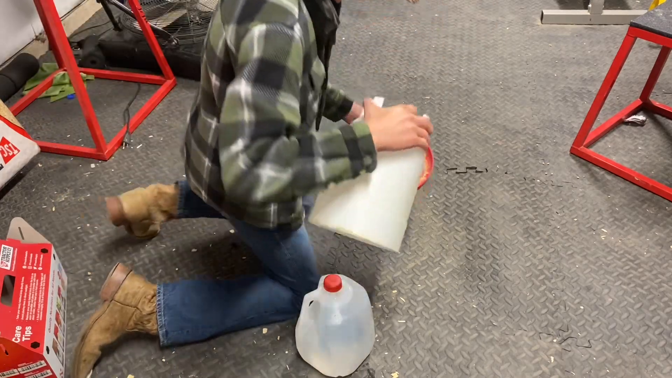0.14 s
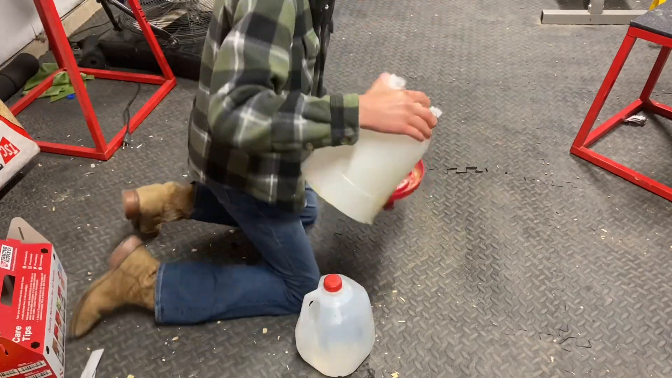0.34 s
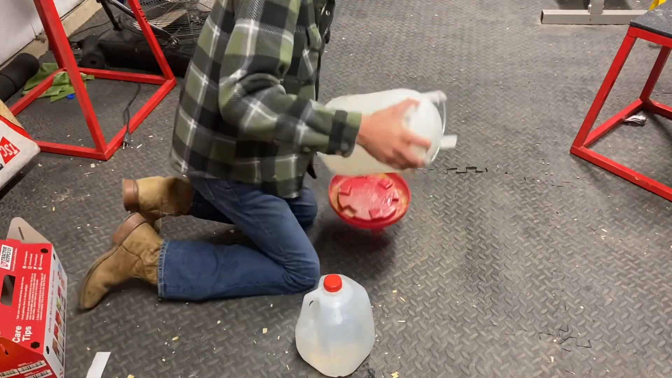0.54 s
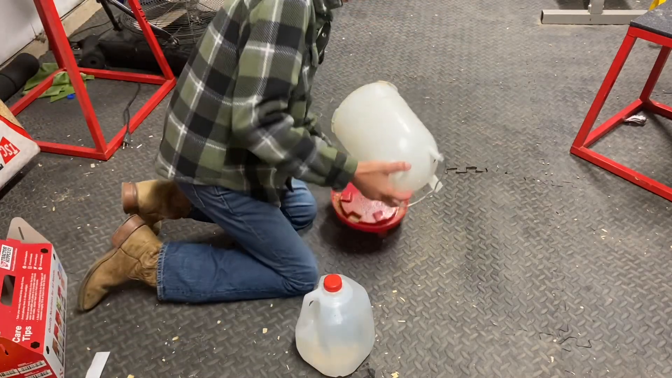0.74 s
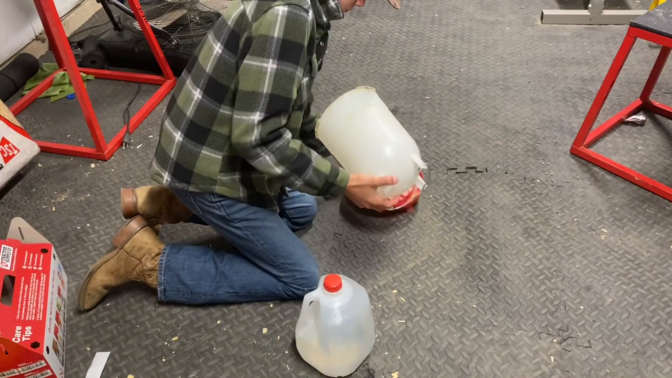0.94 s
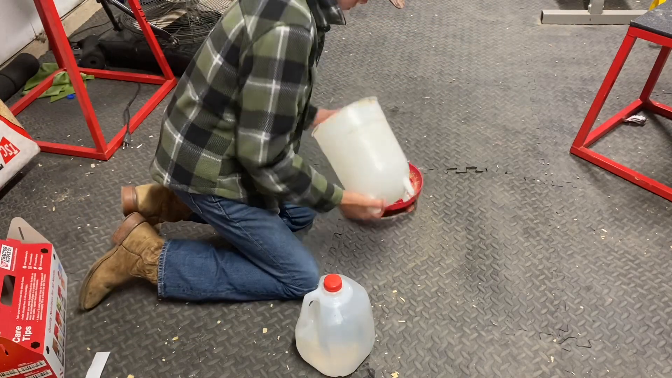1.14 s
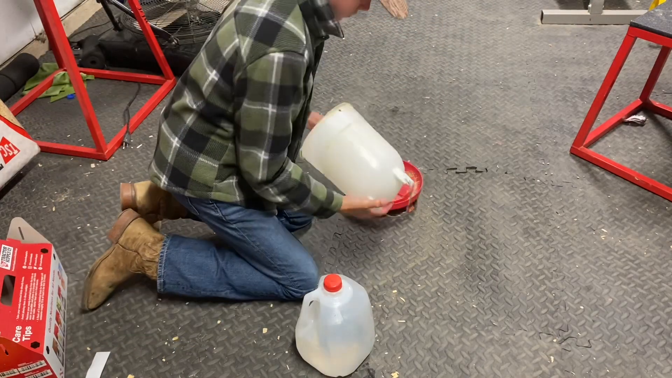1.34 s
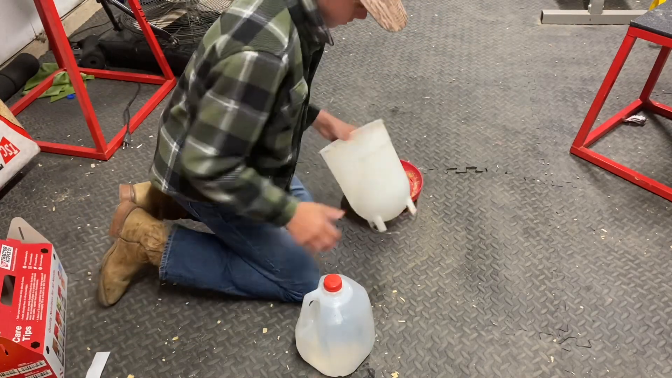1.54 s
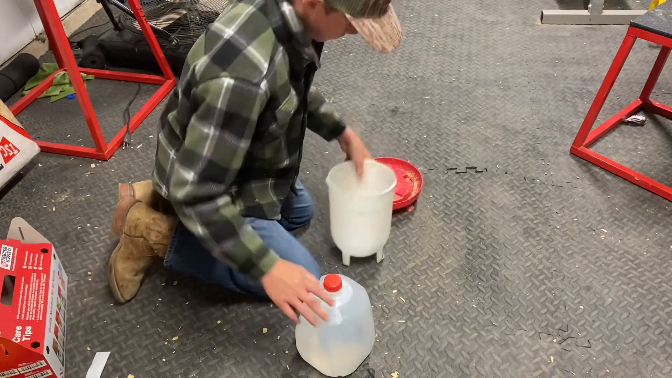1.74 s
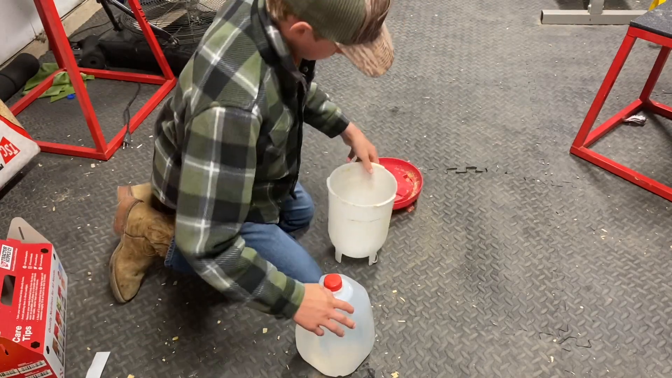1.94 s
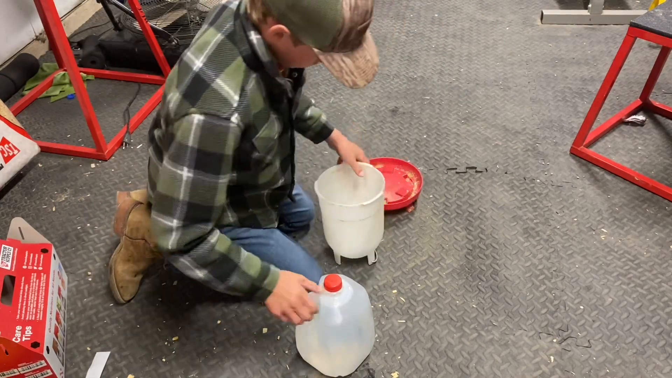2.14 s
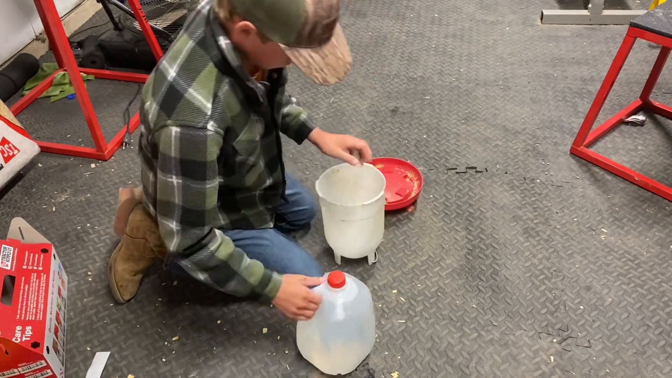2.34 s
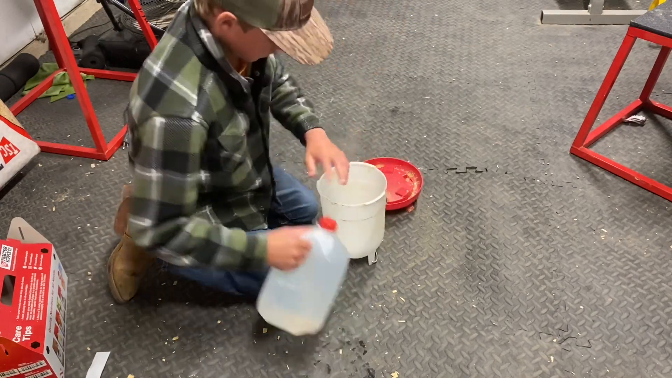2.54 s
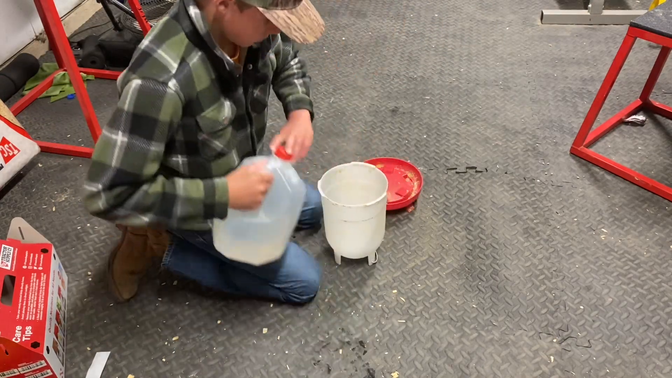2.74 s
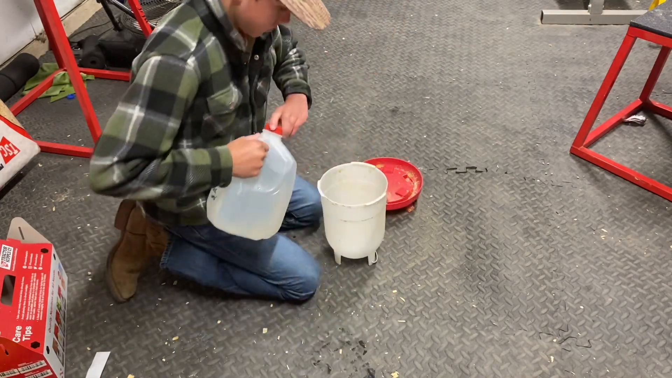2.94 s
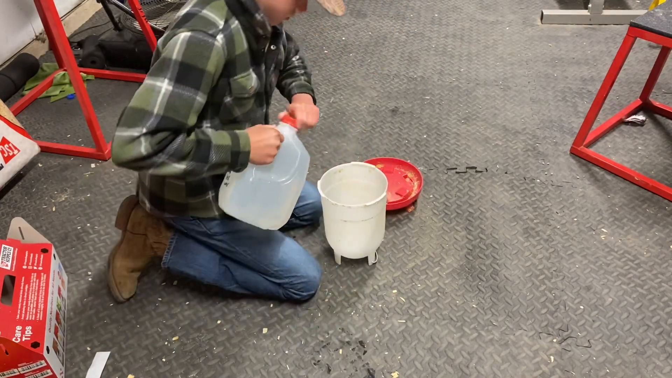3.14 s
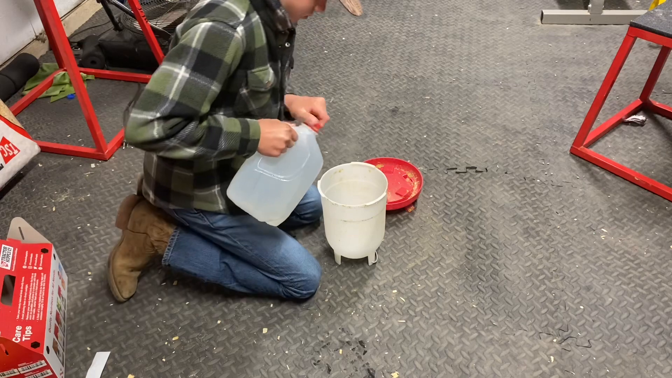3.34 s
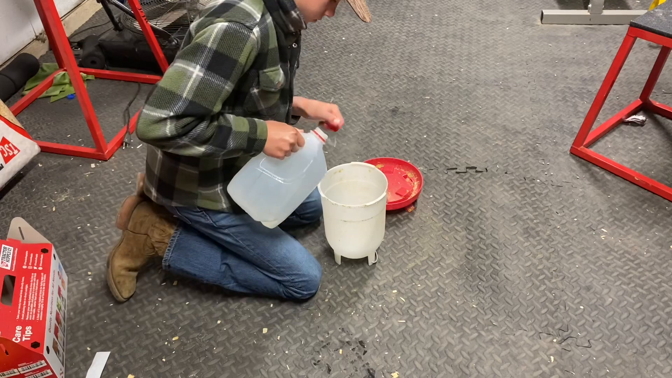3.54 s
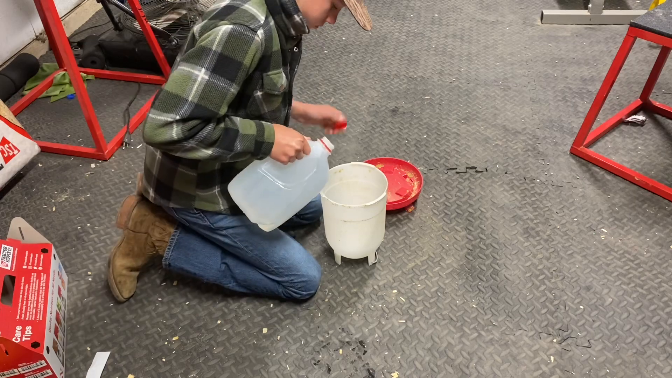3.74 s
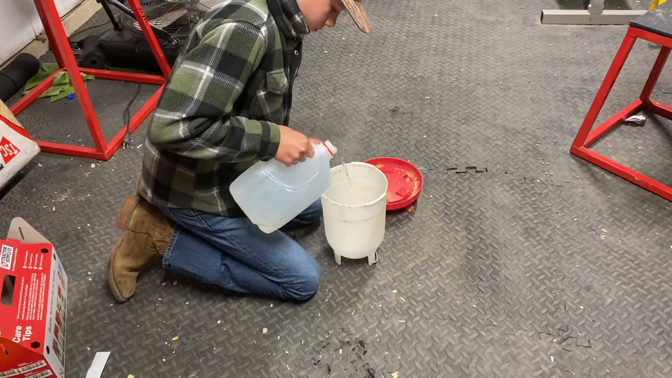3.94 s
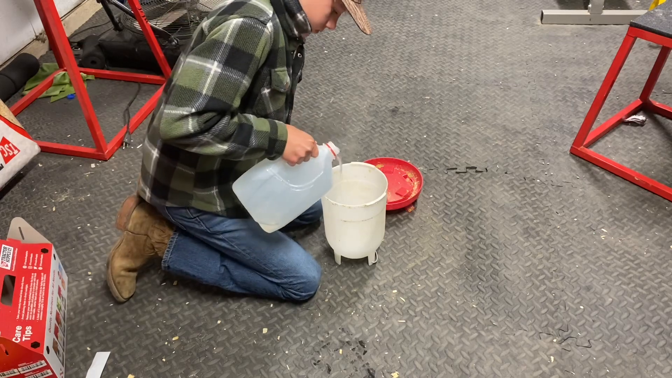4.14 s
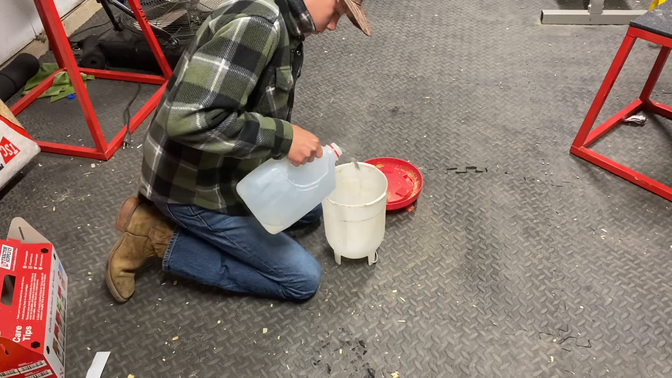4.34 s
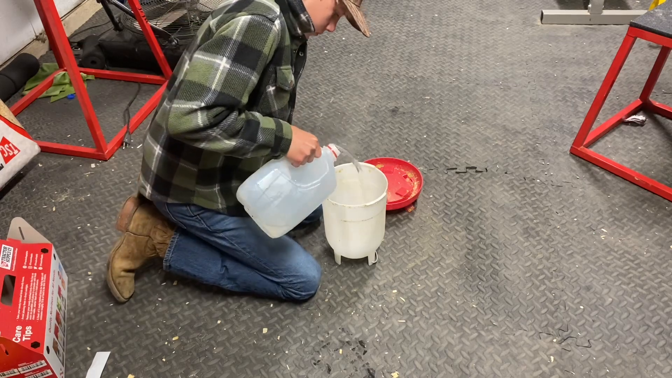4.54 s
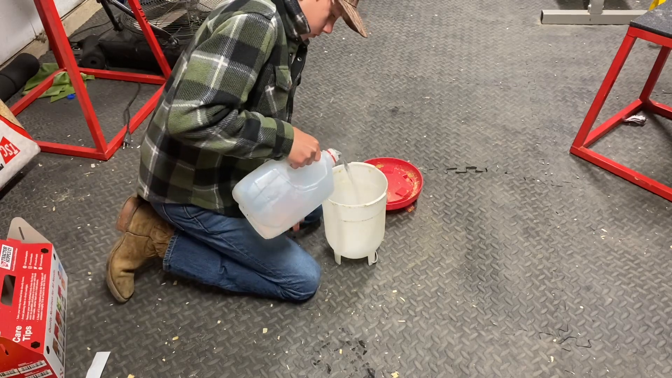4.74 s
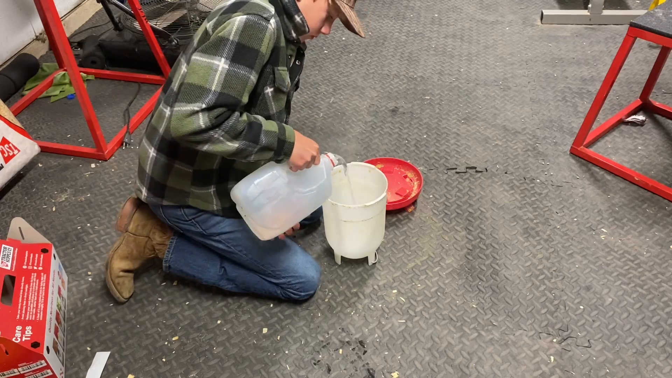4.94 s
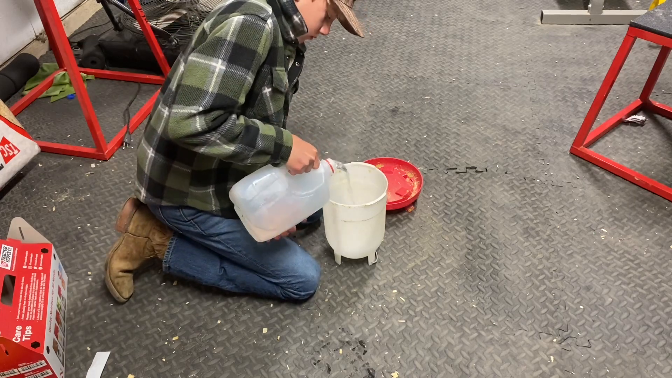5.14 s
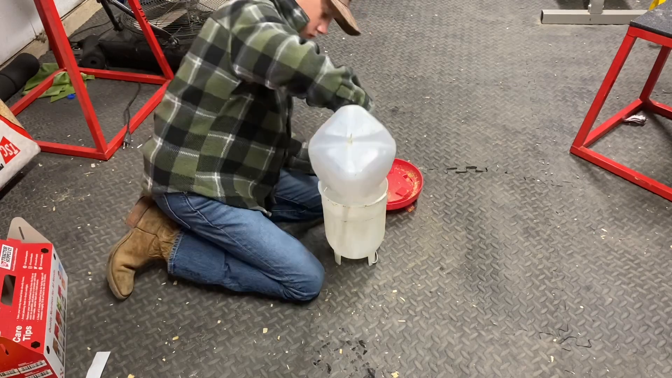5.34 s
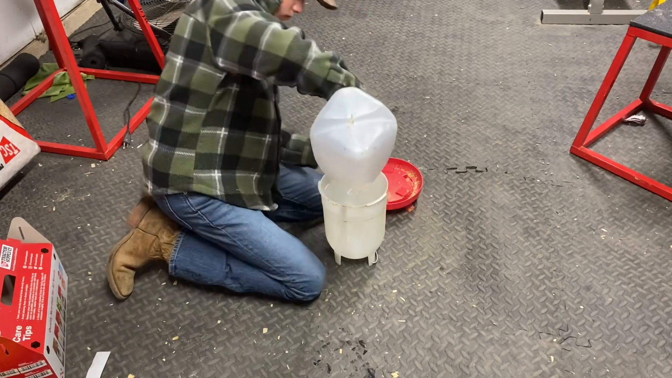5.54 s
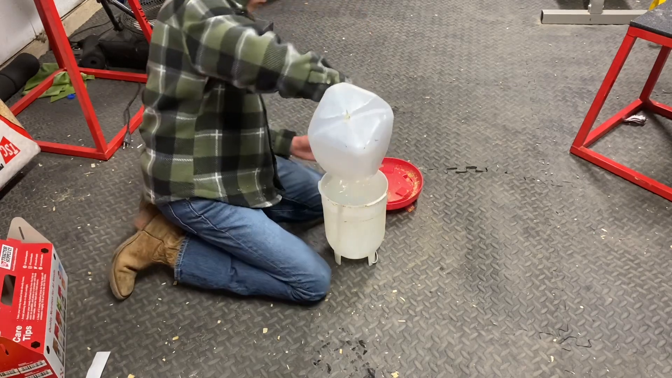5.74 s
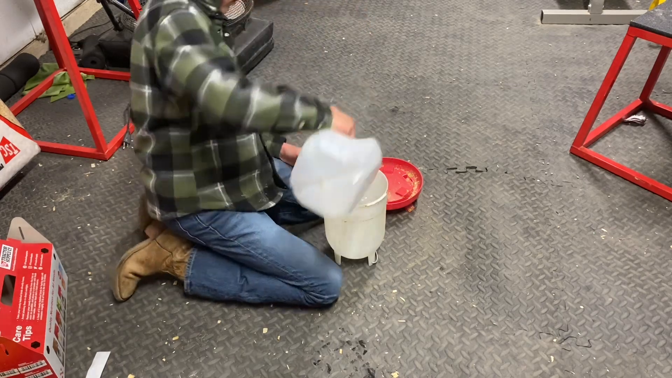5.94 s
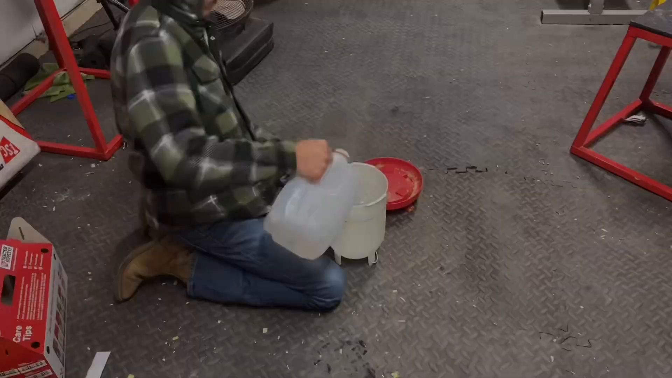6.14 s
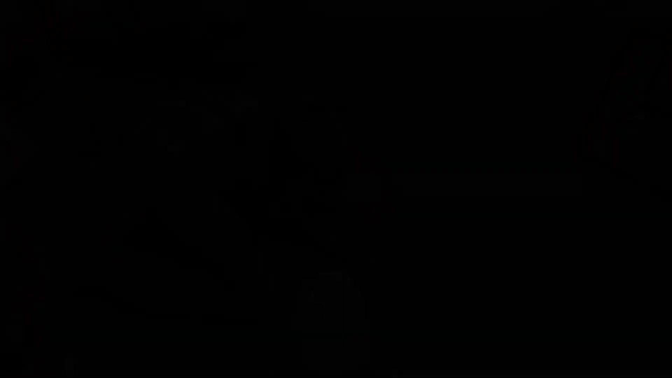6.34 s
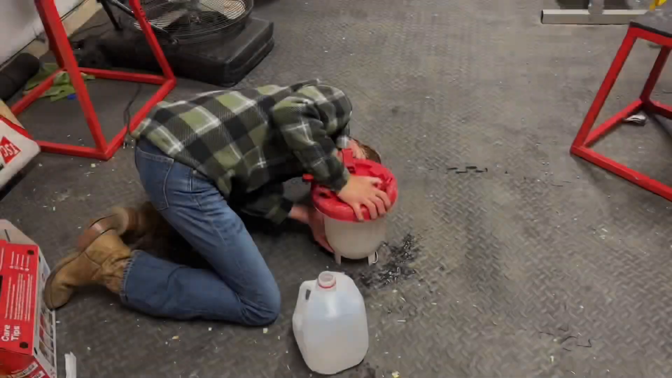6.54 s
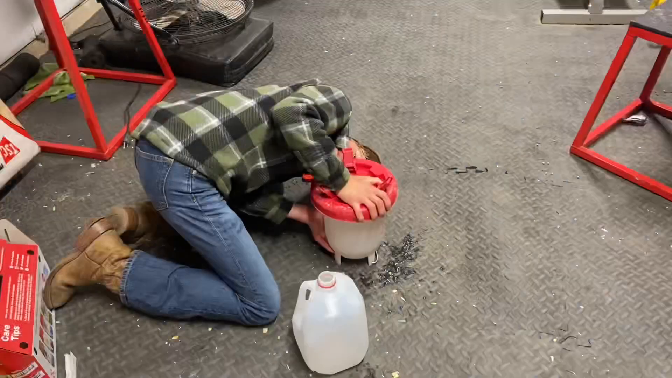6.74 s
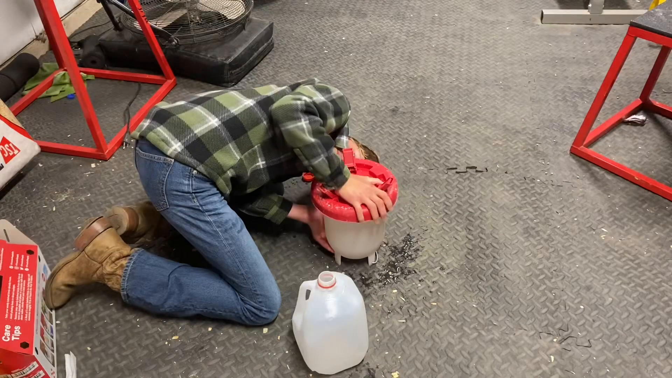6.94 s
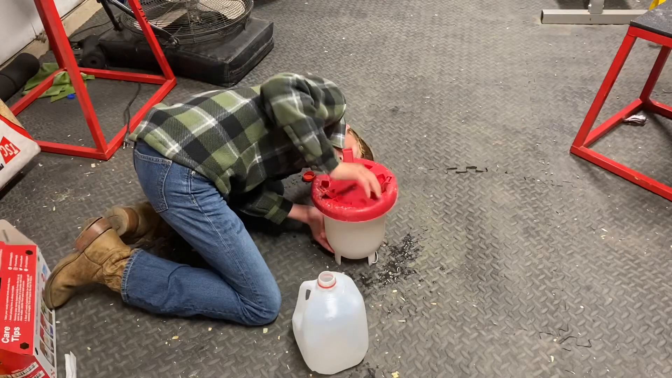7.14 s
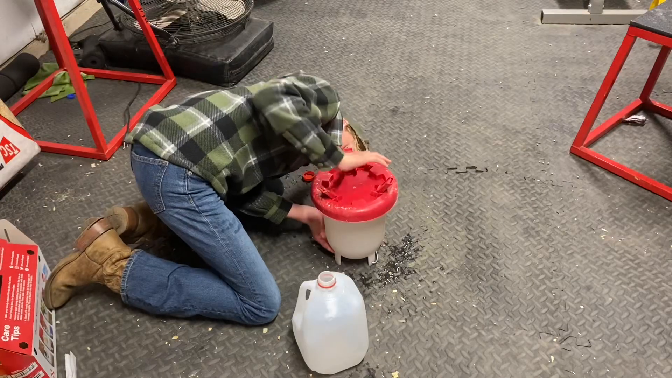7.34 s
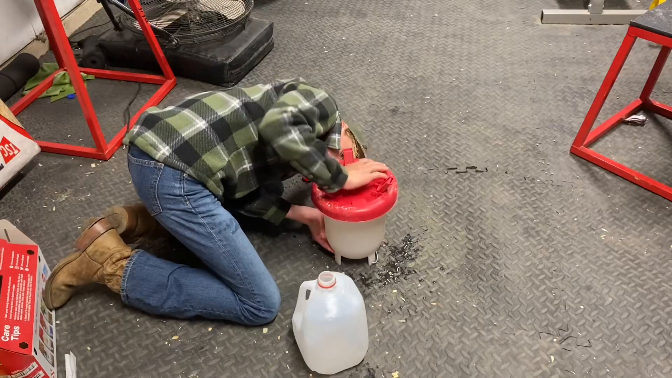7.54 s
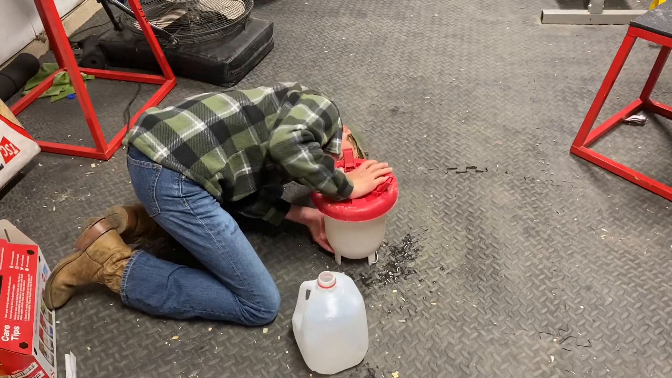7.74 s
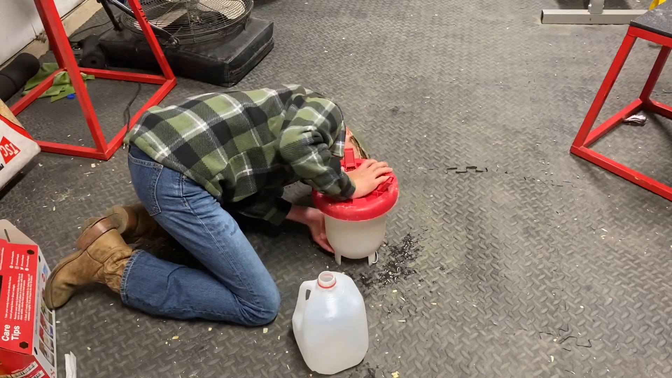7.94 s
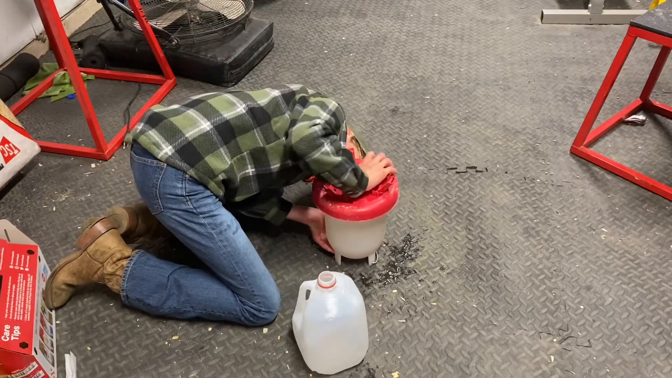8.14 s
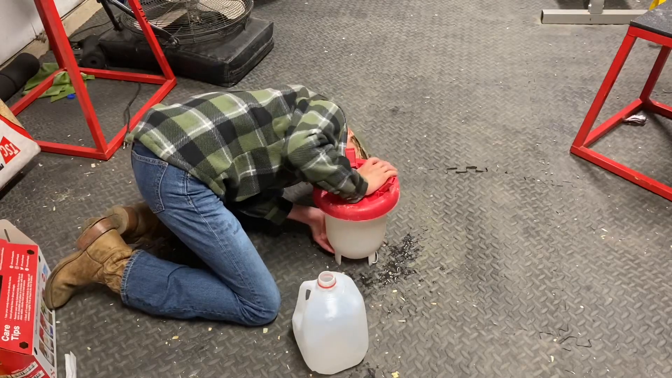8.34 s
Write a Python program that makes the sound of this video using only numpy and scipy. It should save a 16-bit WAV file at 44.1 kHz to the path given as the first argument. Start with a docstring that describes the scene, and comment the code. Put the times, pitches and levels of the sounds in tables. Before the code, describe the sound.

Close plastic handling in a live, echoing room: cloth rustle, sharp hollow knocks, then a boomy rattling set-down. After a quieter spell of small jug clicks, a loud pop leads into plinking drops, a short bubbly gush and a weaker drain. After a quick dip, duller knocks and scrapes follow. Scattered chick peeps, slightly left and roomy, grow frequent late, over low rumble and soft hiss.

```python
"""Low rumble and faint hiss lie under a hard-walled shed; sleeves rustle and chicks peep from across the room.
A plastic poultry waterer is twisted apart and its tank set on the floor: blows ring panels, walls and inner air.
A thin water jug is uncapped, pops as it flexes and is poured into the tank: ringing bubbles, slaps and noisy spray.
Then the base is pressed back on the filled tank, with thumps and scrapes. The level dips briefly twice."""
import sys
import numpy as np
from scipy import signal
from scipy.fft import rfft, irfft
from scipy.io import wavfile
from scipy.ndimage import uniform_filter1d

SR = 44100
rng = np.random.default_rng(int(sys.argv[2]) if len(sys.argv) > 2 else 0)


def file_out(sig):
    """Save sig as 16-bit WAV at sys.argv[1]."""
    # one column per channel
    cols = np.atleast_2d(sig).T
    # limit, then scale
    lim = np.clip(cols, -1, 1)
    pcm = np.round(lim * 32767).astype(np.int16)
    wavfile.write(sys.argv[1], SR, pcm)


N = 374346
T = np.arange(N) / SR

# Table levels precede each function's gain_db.
# damped modes of the empty waterer's walls: mode_hz, width_hz, level_db
WATERER_MODES = [(415, 40, -17), (760, 30, 0), (870, 45, -5), (940, 50, -7), (1200, 60, -9), (1375, 40, -5),
                 (1592, 50, -2), (1800, 90, -3), (1950, 50, -4), (2380, 80, -11), (3050, 80, -17),
                 (4480, 140, -22)]
# first splash, trickle, full stream, then the jug drains upside down: start_s, length_s, bubbles_db, spray_db
GUSHES = [(4.416, 0.02, -72, -52.5), (4.545, 0.27, -64.5, -66), (4.845, 0.42, -55.5, -54.5),
          (5.483, 0.53, -67.5, -64), (5.832, .25, -66, -62), (5.943, 0.043, -60.5, -64)]
GUSH_ATTACK_S, GUSH_RELEASE_S = 0.045, 0.14  # time to change by 20 dB


def undb(db):
    """Decibels to gain."""
    return 10 ** (np.asarray(db) / 20)


def unit(x):
    """Scale to a mean energy of one per channel."""
    return x / np.sqrt(np.mean(np.sum(x ** 2, axis=-1)))


def colour(x, points):
    """Filter by a spectrum of hz, gain_db points, straight over log frequency."""
    hz, db = np.transpose(points)
    f = np.linspace(1, SR / 2, x.shape[-1] // 2 + 1)
    gain = undb(np.interp(np.log(f), np.log(hz), db))
    return irfft(rfft(x) * gain, x.shape[-1])


def band(x, lo_hz, hi_hz, order=2):
    """Causal band-pass."""
    edges_hz = [lo_hz, min(hi_hz, SR / 2 - 100)]
    return signal.sosfilt(signal.butter(order, edges_hz, "band", fs=SR, output="sos"), x)


def normal(x, lo_hz, hi_hz):
    """Scale so that one band has an rms of one."""
    return x / np.std(band(x, lo_hz, hi_hz))


def diffuse(count, alike_hz=520):
    """Stereo noise from all around: mostly alike at both ears in the bass, unrelated in the treble."""
    mid, side = rfft(rng.standard_normal((2, count)))
    alike = 0.9 / (1 + (np.linspace(0, SR / 2, len(mid)) / alike_hz) ** 2)
    mid = mid * np.sqrt(1 + alike)
    side = side * np.sqrt(1 - alike)
    return irfft(np.array([mid + side, mid - side]), count) / np.sqrt(2)


def walk(rate_hz):
    """Random wander with a spread of one."""
    k = int(SR / rate_hz)
    steps = np.repeat(rng.standard_normal(N // k + 1), k)
    w = uniform_filter1d(steps, k)[:N]
    return w / w.std()


def add(track, start_s, x):
    """Mix a sound into a track."""
    i = min(max(int(start_s * SR), 0), N)
    track[..., i:i + x.shape[-1]] += x[..., :N - i]


def pan(left_db):
    """Channel gains for a left-minus-right level."""
    return undb(np.array([[left_db], [-left_db]]) / 2)


def swells(rows, attack_s, release_s):
    """Gain from start_s, length_s, level_db rows: each swells up, holds and dies away."""
    power = 0
    for start_s, length_s, db in rows:
        early = np.maximum(start_s - T, 0) / attack_s
        late = np.maximum(T - start_s - length_s, 0) / release_s
        power = power + undb(db - 20 * (early + late)) ** 2
    return np.sqrt(power)


def ring(t, hz, width_hz):
    """One freely decaying mode; a wider resonance decays faster."""
    return unit(np.sin(2 * np.pi * hz * t) * np.exp(-np.pi * width_hz * t))


def bubble(start_hz, cycles, glide):
    """A trapped bubble rings for some cycles and rises in pitch as it nears the surface."""
    age = T[:int(3 * cycles / start_hz * SR)] * start_hz / cycles
    return unit(np.sin(2 * np.pi * cycles * age * (1 + glide * age / 2)) * np.exp(-2 * age))


def shed(x, direct_db, tail_db, lead_s=0.000046, t60_low_s=0.52, t60_mid_s=0.53, t60_high_s=0.21,
         high_db=-3, build_s=0.0036):
    """Direct sound, a few close reflections and a diffuse tail that dulls as it fades."""
    # nearby surfaces: delay_s, gain_db relative to direct
    echoes = [(.0014, -26), (.0077, -23), (.011, -15.5), (.0186, -17.5)]
    t = T[:SR]
    noise = diffuse(len(t))
    # lo_hz, hi_hz, t60_s, level_db
    bands = [(40, 600, t60_low_s, 0), (600, 7000, t60_mid_s, 0), (7000, 18000, t60_high_s, high_db)]
    tail = 0
    for k, (lo_hz, hi_hz, t60_s, db) in enumerate(bands):
        decay = np.exp(-np.log(1000) * t / t60_s)
        tail = tail + (-1) ** k * undb(db) * band(noise, lo_hz, hi_hz) * decay
    response = undb(tail_db) * unit(tail * (1 - np.exp(-t / build_s)))
    # direct sound reaches the left port just before the right
    response[[0, 1], [0, round(lead_s * SR)]] += undb(direct_db)
    for k, (delay_s, db) in enumerate(echoes):
        # reflections come from alternate sides, 3 samples later at the far port
        i = int(delay_s * SR)
        response[k % 2, i] += undb(direct_db + db)
        response[1 - k % 2, i + 3] += undb(direct_db + db)
    return signal.fftconvolve(x[None], response, axes=1)[:, :N]


def background(rumble_db=1, flutter_db=0.5, rest_db=-80.5, air_db=-77):
    """An uneven low rumble under a faint even hiss, both coloured diffuse noise."""
    # spells of rumble: start_s, length_s, level_db
    spells = [(0, 5.27, -58.5), (5.45, 1.39, -67.5), (7.2, 0.066, -58.5)]
    # spectra: hz, gain_db
    rumble_colour = [(15, -36), (25, -11.5), (76, 4), (179, 2), (346, -10.5), (550, -16), (628, -19),
                     (682, -17.5), (818, -28.5), (904, -20.5), (1300, -29), (1690, -52.5), (2860, -120)]
    air_colour = [(120, -43), (200, -16.5), (366, -8), (473, -13.5), (1120, -15.5), (1810, -12.5),
                  (3370, -21.5), (8000, -25.5), (12000, -32), (16000, -50)]
    level = swells(spells, attack_s=0.27, release_s=0.23) + undb(rest_db)
    rumble = normal(colour(diffuse(N), rumble_colour), 35, 300)
    rumble = rumble * level * undb(rumble_db + flutter_db * walk(12))
    hiss = normal(colour(diffuse(N), air_colour), 140, 16000) * undb(air_db)
    return rumble * pan(left_db=-3.5) + hiss


def chicks(knee=0.88, late=1.7, rasp_db=7, tremble_db=2, octave_db=-20, octave_spread_db=4, gain_db=-4):
    """Whistles arch through a crest and level off; the wider the pitch span, the rougher the voice."""
    # start_s, length_s, top_hz, end_hz, level_db, late_swell_db, crest_place (0-1)
    calls = [(0, 0.018, 3350, 3120, -53.5, -22, 0.38), (0.588, 0.042, 3250, 2700, -54.5, -21, 0.2),
             (0.906, 0.063, 3640, 2830, -50.5, -26, 0.05), (3.108, .035, 3500, 3750, -68, -26, 0.23),
             (3.133, 0.033, 3734, 2773, -48.5, -21, 0.21), (3.159, 0.039, 3450, 2784, -56.5, -24, .15),
             (3.376, 0.06, 2520, 2000, -62, -23, 0.37), (3.677, 0.027, 3080, 2850, -62, -19, 0.76),
             (3.68, 0.091, 2760, 2100, -58, -31, 0.45), (3.808, 0.053, 3065, 2950, -52.5, -28, 0.21),
             (4.083, 0.041, 3900, 3400, -54, -27, 0.32), (5.404, 0.051, 2867, 2700, -51, -9, 0.48),
             (5.47, 0.058, 2666, 2570, -50, -8, 0.28), (5.717, 0.069, 2890, 2560, -45, -7, 0.2),
             (6.022, .075, 2915, 2590, -42.5, -11, .22), (6.437, 0.048, 3490, 2960, -59.5, -19, 0),
             (6.573, 0.049, 3920, 3000, -57, -2, 0), (6.673, 0.053, 3404, 2700, -63, -27, 0.02),
             (6.764, 0.056, 3790, 2730, -57, -30, .25), (6.794, 0.033, 4870, 4750, -70, -20, .2),
             (6.82, 0.06, 3780, 2700, -61, -14, 0.16), (6.894, 0.072, 3970, 3300, -54, -6, 0.17),
             (6.957, 0.069, 3920, 2850, -62, -16, 0.1), (7.009, 0.059, 3770, 2600, -62, -15, 0.5),
             (7.247, .04, 4500, 4250, -68.5, -20, 0.17), (7.835, 0.081, 4350, 2850, -68, -23, 0.16),
             (7.853, 0.05, 3570, 2650, -60, -20, 0.2), (7.989, .065, 4780, 2950, -64.5, -26, 0.18),
             (7.993, 0.051, 3650, 2750, -56, -13, 0.13), (8.125, 0.051, 3780, 2750, -57.5, -10, 0.14),
             (8.254, 0.045, 3696, 2850, -53, -24, 0.17), (8.282, 0.062, 3770, 2800, -60.5, -20, .2),
             (8.429, 0.058, 4170, 3200, -62.5, -20, 0.15), (8.432, 0.057, 3690, 2750, -50, -20, 0.1)]
    beak_hz, beak_width_hz = 6000, 480
    jitter = 0.046  # pitch jitter per unit of log span
    late_swell_s = 0.1  # the room swells again after a call
    out = np.zeros(N)
    wobble, flutter, tremble = walk(700), walk(400), walk(110)
    beaks = rng.uniform(-1, 1, len(calls))
    for (start_s, length_s, top_hz, end_hz, db, late_swell_db, crest), beak in zip(calls, beaks):
        u = np.linspace(0, 1, int(length_s * SR))
        now = (int(start_s * SR) + np.arange(len(u))) % N
        strain = abs(np.log(top_hz / end_hz))
        arch = np.cos(np.pi / 2 * np.clip((u - crest) / (knee - crest), -0.5, 1)) ** 2
        hz = (end_hz + (top_hz - end_hz) * arch) * (1 + jitter * strain * wobble[now])
        phase = 2 * np.pi * np.cumsum(hz) / SR
        roughness_db = rasp_db * strain * flutter[now] + tremble_db * tremble[now]
        swell = np.abs(np.sin(np.pi * u ** late)) ** 0.5 * undb(roughness_db)
        # the octave sweeps through the beak's resonance; the beak opens differently for each call
        octave = undb(octave_db + octave_spread_db * beak) / (1 + ((2 * hz - beak_hz) / beak_width_hz) ** 2)
        call = swell * (np.sin(phase) + octave * np.sin(2 * phase))
        call = undb(db + gain_db) * call / call.std()
        add(out, start_s, call)
        add(out, start_s + late_swell_s, undb(late_swell_db) * call)
    return out


def cloth(patchy_db=7.5, grain_db=4.5, gain_db=-4):
    """Fibres catch and let go in dense, uneven grains of coloured noise."""
    # strokes of sleeves and trousers: start_s, length_s, level_db
    rubs = [(0, 0.0038, -65), (.24, 0.23, -50), (1.40, 0.28, -52.5), (2.44, 0.28, -64), (2.82, 0.23, -69)]
    # brief scuffs as the grip shifts: start_s, length_s, level_db
    scuffs = [(.168, 0.02, -58), (1.39, .015, -67), (1.625, 0.011, -54), (2.385, 0.0059, -52.5),
              (2.537, 0.0034, -76), (2.995, 0.0033, -80), (7.98, .03, -71.5), (8.28, 0.015, -70)]
    # spectrum: hz, gain_db
    cloth_colour = [(180, -34), (300, -4.5), (372, -6.5), (593, -6), (930, -2), (1120, -2.5), (3000, -1),
                    (5900, -1.5), (7320, 0), (8640, -12.5), (10000, -3.5), (11800, -2), (13500, -29),
                    (15000, -12), (16000, -23.5)]
    grains = rng.standard_normal(N) * undb(patchy_db * walk(45.07) + grain_db * walk(900))
    rubbing = swells(rubs, attack_s=0.35, release_s=0.22)
    scuffing = swells(scuffs, attack_s=0.046, release_s=0.06)
    return undb(gain_db) * normal(colour(grains, cloth_colour), 5400, 12000) * np.hypot(rubbing, scuffing)


def snaps(gain_db=20):
    """Short bright noise bursts: cloth, fingers, drops, and the sharp edge of tank and jug knocks."""
    # start_s, level_db, centre_hz, decay_s
    ticks = [(.096, -68, 8900, .0008), (0.1147, -53.5, 8300, 0.0008), (0.133, -57, 9500, 0.00057),
             (0.199, -54.5, 1940, 0.003), (0.225, -49.5, 5960, 0.00047), (0.257, -51, 2360, 0.0025),
             (1.787, -35.5, 5040, 0.0031), (2.536, -58, 5800, 0.0012), (2.55, -66, 6200, 0.00081),
             (3.45, -59.5, 5900, 0.0018), (3.784, -60.5, 9340, .003), (4.118, -43, 7550, 0.00065),
             (4.371, -54, 6300, 0.0072), (4.416, -44.5, 3930, 0.0071), (4.553, -58, 2700, 0.0022),
             (4.893, -49, 2400, 0.00038), (5.01, -52, 3000, 0.00099), (5.083, -46, 8500, 0.0018),
             (5.326, -41, 6800, 0.0017), (5.431, -64, 6500, 0.0018), (5.487, -55, 4460, .006),
             (5.516, -56, 4300, .003), (5.81, -55, 9000, .002), (6.0626, -47, 7500, 0.0007),
             (6.068, -63, 7640, .001), (6.079, -69, 10000, .0015), (6.277, -69, 6800, 0.00078),
             (6.948, -66, 6360, 0.00094)]
    out, t = np.zeros(N), T[:SR // 40]
    for start_s, db, hz, decay_s in ticks:
        burst = rng.standard_normal(len(t)) * np.exp(-t / decay_s)
        add(out, start_s, undb(db + gain_db) * unit(band(burst, hz / 2, hz * 1.6)))
    return out


def knocks(blows, modes, hollow_hz, hollow_width_hz, panel_span, skirt_db, wall_db, air_db, crack_db, gain_db,
           crack_s=0.004, flex=0.025):
    """Each blow snaps a damped panel, rings walls and inner air, thumps and cracks; returns shell and air."""
    shell, hollow = np.zeros((2, N))
    t = T[:SR // 2]
    tick = 1.0 * (t == 0)
    walls = sum(undb(db) * ring(t, hz, width_hz) * (-1) ** k for k, (hz, width_hz, db) in enumerate(modes))
    # walls radiate little below their first listed mode
    walls = unit(band(walls, modes[0][0], SR / 2, order=3))
    thump = unit(band(tick, 65, 690, order=3))
    for start_s, db, hz, thump_db, scrape_s in blows:
        # first contact, then small slips as the parts slide
        slips, grit = rng.standard_normal((2, len(t)))
        scrape = unit(slips * np.abs(slips) ** 2 * t ** 0.54 * np.exp(-t / scrape_s))
        push = unit(tick + scrape_s / 0.0023 * scrape) * np.sqrt(1 + scrape_s / 0.084)
        panel = unit(band(tick, hz / (1 + panel_span), hz * (1 + panel_span)))
        skirt = undb(skirt_db) * unit(band(tick, hz / 1.4, hz * 2))
        crack = undb(crack_db) * unit(band(grit * np.exp(-t / crack_s), 1400, 6600, order=3))
        body = unit(panel + skirt) + undb(wall_db) * walls + undb(thump_db) * thump + crack
        add(shell, start_s, undb(db + gain_db) * signal.fftconvolve(push, body)[:len(t)])
        # enclosed air takes a few cycles to swing up; its note strays per blow as the walls flex
        note_hz = hollow_hz * (1 + flex * rng.uniform(-0.99, 1))
        air = unit(ring(t, note_hz, hollow_width_hz) * (1 - np.exp(-t / 0.0089)))
        add(hollow, start_s, undb(db + gain_db + thump_db + air_db) * air)
    return np.array([shell, hollow])


def base_twisted_off():
    """The base knocks and scrapes on the empty tank."""
    # start_s, level_db, panel_hz, thump_db, scrape_s
    blows = [(.689, -34.5, 1844, -10, 0.009), (.692, -39, 700, -15, 0.0077), (.902, -39, 719, -32.5, 0.01),
             (.953, -28.5, 776.5, -29, 0.01), (.962, -36, 2033, -24.5, 0.01),
             (.9893, -20, 1402, -23.5, 0.00016), (.9905, -23.5, 771, -26, .0005),
             (.9955, -31, 838, -18.5, .0008), (.9998, -31, 1250, -20, 0.00033),
             (1.013, -35, 900, -10.5, .001), (1.052, -34, 1105, -8.5, 0.0044),
             (1.079, -33.5, 1776, -27.5, 0.00046)]
    return knocks(blows, WATERER_MODES, hollow_hz=325, hollow_width_hz=17, panel_span=0.47, skirt_db=-1.5,
                  wall_db=-2.5, air_db=1, crack_db=-21.5, gain_db=18.5)


def tank_set_down():
    """The open, empty tank is lifted clear and rocks onto its feet."""
    # start_s, level_db, panel_hz, thump_db, scrape_s
    blows = [(1.215, -50, 300, -1, 0.017), (1.346, -43, 1220, -13.5, 0.0057),
             (1.360, -32.5, 2050, -11, .0052), (1.376, -46.5, 151.6, -2, 0.0073),
             (1.6488, -41.5, 2870, -28.5, 0.00037), (1.762, -30.5, 1700, -12.5, 0.0036),
             (1.7693, -27.5, 1650, -10, 0.0016), (1.782, -26.5, 1640, -6, 0.0039),
             (1.7878, -27.5, 2100, -18.5, 0.00055), (1.7914, -27.5, 1950, -18, 0.0011),
             (1.7952, -30, 1800, -16.5, 0.00044), (1.8155, -30.5, 1750, -25, 0.00039),
             (1.832, -28, 1950, -26.5, 0.003), (1.850, -36.5, 1770, -15, 0.00071),
             (1.874, -33, 1800, -28, 0.0054), (1.886, -32.5, 1700, -25.5, 0.0005),
             (1.908, -32, 1800, -23.5, 0.00067), (1.9116, -22.5, 1727, -24.5, 0.00027),
             (1.9185, -27, 1800, -22, 0.0006), (1.9712, -36, 1900, -8.5, 0.00043),
             (2.206, -50, 1630, -2.5, 0.0018)]
    return knocks(blows, WATERER_MODES, hollow_hz=330, hollow_width_hz=27, panel_span=0.2, skirt_db=-18.5,
                  wall_db=-19, air_db=2, crack_db=-33.5, gain_db=21.5)


def booms(sag=0.02):
    """The tank's bottom flexes and pumps the air inside: short hollow notes that sag in pitch."""
    # start_s, length_s, level_db, mid_pitch_hz
    pushes = [(0.681, 0.061, -52.5, 323), (1.214, 0.079, -48.5, 321), (1.422, 0.024, -56, 350),
              (1.619, 0.054, -53.5, 334), (1.779, .062, -32, 342), (1.921, 0.052, -42, 352.5),
              (6.4, 0.027, -51.5, 289)]
    out = np.zeros(N)
    for start_s, length_s, db, hz in pushes:
        u = np.linspace(0, 1, int(length_s * SR))
        phase = 2 * np.pi * np.cumsum(hz * (1 + sag * (0.5 - u))) / SR
        add(out, start_s, 2 * undb(db) * np.sin(np.pi * u) * np.sin(phase))
    return out


def base_refitted():
    """The base is set on the filled tank and pressed home."""
    # start_s, level_db, panel_hz, thump_db, scrape_s
    blows = [(6.396, -46, 141, -12, 0.0019), (6.4035, -37.5, 677, -3.5, 0.0017),
             (6.404, -47.5, 1710, -8, 0.0075), (6.918, -42, 510, -35, 0.038),
             (6.935, -52, 1410, -15, 0.068), (7.110, -35, 1620, -9, 0.0029), (7.128, -43, 1890, -8, 0.011),
             (7.153, -32.5, 900, -25, 0.0017), (7.158, -41.5, 2010, -9, 0.0084),
             (7.325, -56, 2130, -5, .0057), (7.379, -65.5, 3060, 4, 0.0023),
             (7.735, -68.5, 1515, 4, 0.0044), (7.95, -62.5, 1990, -21.5, 0.0099),
             (8.274, -59.5, 2090, -2, 0.0039)]
    # water-laden tank and base: mode_hz, width_hz, level_db
    modes = [(272, 61, -6.5), (443, 24, -1.5), (580, 82, -9.5), (920, 14, 1), (1237, 64, -4),
             (1500, 56, -12), (1640, 100, -9), (1940, 47, -4), (2510, 60, -8), (3250, 1100, -19)]
    return knocks(blows, modes, hollow_hz=285, hollow_width_hz=12, panel_span=0.3, skirt_db=-3,
                  wall_db=-4, air_db=-10, crack_db=-20.5, gain_db=19.5)


def jug_flexed():
    """The jug is lifted and uncapped, then its thin sides pop as it empties."""
    # start_s, level_db, panel_hz, thump_db, scrape_s
    blows = [(2.461, -47.5, 1670, -8, .005), (2.48, -48.5, 1310, -7, 0.009),
             (3.216, -45.5, 1570, -6.5, 0.0021), (3.422, -46.5, 656, 2, 0.0061),
             (3.447, -42.5, 1230, 4, 0.0028), (3.640, -53.5, 1290, -19, 0.0046),
             (3.7655, -42.5, 2100, -37, 0.0027), (4.078, -42.5, 1690, -42, 0.0053),
             (4.1427, -24, 2270, -54, 0.00069), (4.1505, -41, 2370, -36, .0005),
             (4.1615, -36, 2240, -35, 0.00044), (4.311, -40.5, 2180, -12, 0.00025),
             (4.391, -33.5, 2030, -38, 0.0017), (4.8385, -33, 1640, -13.5, 0.0017),
             (4.858, -35, 2050, -30, 0.0032), (4.949, -42, 1900, -25, 0.00075),
             (5.213, -41, 784, -3, 0.0016), (5.980, -37.5, 1350, -38, 0.00096)]
    # jug walls: mode_hz, width_hz, level_db
    modes = [(1730, 45, 21.5), (2100, 37, -4), (2360, 190, 21), (2700, 31, -17.5), (3560, 80, -41)]
    return knocks(blows, modes, hollow_hz=345, hollow_width_hz=16, panel_span=0.19, skirt_db=-44,
                  wall_db=-4.5, air_db=-10, crack_db=-11.5, gain_db=18)


def sloshes(hz=355, span=0.19, broken_db=2, gain_db=-5):
    """Water shifting in the tilted jug stirs its air in fits, around the hollow note."""
    # start_s, length_s, level_db
    shifts = [(3.78, 0.01, -66), (4.1, 0.33, -60)]
    air = band(rng.standard_normal(N), hz / (1 + span), hz * (1 + span)) * undb(broken_db * walk(30))
    return undb(gain_db) * air / air.std() * swells(shifts, GUSH_ATTACK_S, GUSH_RELEASE_S)


def glugs(cycles=10, glide=0.029, gain_db=22):
    """Single bubbles ring clear of the stream, from small plinks to gulped air pockets."""
    # start_s, level_db, start_pitch_hz
    pockets = [(4.521, -47, 1640), (4.566, -49, 1500), (4.602, -50, 1540), (4.652, -45, 1480),
               (4.695, -49, 1290), (4.767, -57, 1950), (4.79, -48, 2050), (4.829, -42, 1660),
               (4.849, -41, 775), (4.894, -45, 1580), (4.999, -41, 1700), (5.011, -46, 1820),
               (5.04, -39.5, 1810), (5.05, -44, 462), (5.087, -43, 1740), (5.123, -41.5, 436),
               (5.153, -50, 950), (5.177, -40.5, 1720), (5.212, -37, 512), (5.221, -42, 1650),
               (5.229, -54, 795), (5.25, -47, 356), (5.268, -45, 1700)]
    out = np.zeros(N)
    for start_s, db, hz in pockets:
        add(out, start_s, undb(db + gain_db) * bubble(hz, cycles, glide))
    return out


def splats(lo_hz=1100, hi_hz=4200, cycles=5.2, spread_db=3.5, gain_db=-8.5, count=260):
    """The full stream breaks into blobs that slap the water, each a short, dull ring."""
    out = np.zeros(N)
    start_s, length_s, db, _ = max(GUSHES, key=lambda gush: gush[2])
    for when, size, strength in rng.random((count, 3)):
        hz = lo_hz * (hi_hz / lo_hz) ** size
        blob = undb(-spread_db * np.log(0.03 + strength)) * bubble(hz, cycles, glide=0.1)
        add(out, start_s + when * (length_s + GUSH_ATTACK_S), blob)
    return undb(db + gain_db) * out / out.std() * np.sqrt(length_s / T[-1])


def pour(cycles=7, glide=0.075, size_db=6, drop_db=6, splash_db=0.5, spray_db=-3, spurt_db=-1.5, count=1400):
    """The stream arrives in spurts, traps bubbles of all sizes and spatters droplets on the tank wall."""
    # spectra: hz, gain_db
    bubble_colour = [(300, -1), (460, -11), (680, -12.5), (950, 2), (1250, -2.5), (1700, 3.5), (2400, -0.5),
                     (3500, -12.5), (6000, -29)]
    spray_colour = [(1500, -2), (3000, 9.5), (4500, 4), (7500, 3.5), (8500, -4), (10000, 1.5), (12000, 2.5),
                    (13500, -19), (15500, -10)]
    stream = swells([(s, length_s, db) for s, length_s, db, _ in GUSHES], GUSH_ATTACK_S, GUSH_RELEASE_S)
    spatter = swells([(s, length_s, db) for s, length_s, _, db in GUSHES], GUSH_ATTACK_S, GUSH_RELEASE_S)
    first_s = GUSHES[0][0] - GUSH_ATTACK_S
    last_s = max(s + length_s for s, length_s, _, _ in GUSHES) + 2 * GUSH_RELEASE_S
    flows = stream / stream.max()
    bubbles = np.zeros(N)
    for when, size, strength, luck in rng.random((count, 4)):
        start_s = first_s + when * (last_s - first_s)
        flow = flows[int(start_s * SR)]
        # a trickle traps few bubbles, so each stands out; a gush traps many
        if luck < flow ** 0.5:
            hz = 400 * 14 ** size
            gain = undb(-size_db * np.log(0.022 + strength)) * np.sqrt(hz / flow ** 0.5)
            add(bubbles, start_s, bubble(hz, cycles, glide) * gain)
    bubbles = normal(colour(bubbles, bubble_colour), 480, 1670) * np.sqrt((last_s - first_s) / T[-1])
    drops = rng.standard_normal(N) * undb(drop_db * walk(1500) + spurt_db * walk(70))
    spray = normal(colour(drops, spray_colour), 5940, 10900)
    return undb(splash_db) * bubbles * stream + undb(spray_db) * spray * spatter


def scene():
    """Handling and water are close by; the chicks are off to the left, heard mostly through the room."""
    # brief level dips: centre_s, depth_db
    dip_rows = [(5.388, -23), (6.349, -15)]
    dip_s = 0.02  # half width to 1/e of the depth in dB
    peeps = shed(chicks(), direct_db=1, tail_db=3, lead_s=0.00044, t60_mid_s=0.42) * pan(left_db=3)
    rustle = shed(cloth(), direct_db=2.5, tail_db=5) * pan(left_db=1.2)
    ticks = shed(snaps(), direct_db=8.5, tail_db=5.5)
    base, base_air = base_twisted_off()
    tank, tank_air = tank_set_down()
    jug, jug_air = jug_flexed()
    refit, refit_air = base_refitted()
    plastic = shed(base, direct_db=2, tail_db=1.5)
    plastic += shed(tank, direct_db=2.5, tail_db=2, t60_mid_s=0.51) * pan(left_db=-0.5)
    plastic += shed(jug, direct_db=0.5, tail_db=-0.5)
    plastic += shed(refit, direct_db=2, tail_db=1, t60_mid_s=0.48)
    hollow = base_air + tank_air + jug_air + refit_air + sloshes()
    boom = shed(hollow, direct_db=3, tail_db=2.5, lead_s=0.00021) * pan(left_db=-2.5)
    boom += shed(booms(), direct_db=1.5, tail_db=-12.5, lead_s=0.0003) * pan(left_db=-11)
    water = shed(pour() + splats(), direct_db=-0.5, tail_db=0.5)
    water += shed(glugs(), direct_db=-1.5, tail_db=-5.5)
    dips = undb(sum(db * np.exp(-((T - s) / dip_s) ** 2) for s, db in dip_rows))
    return (background() + peeps + rustle + ticks + plastic + boom + water) * dips


def record(dry):
    """The microphone has a notch in the high treble, a lift above it and a steep top cut."""
    top_hz = 15900
    heard = colour(dry, [(11500, -3.5), (12500, -7), (13400, -8), (14600, 4.5), (15500, 9)])  # hz, gain_db
    return signal.sosfilt(signal.ellip(10, 0.2, 70, top_hz, fs=SR, output="sos"), heard)


dry = scene()
out = record(dry)
file_out(out)
```